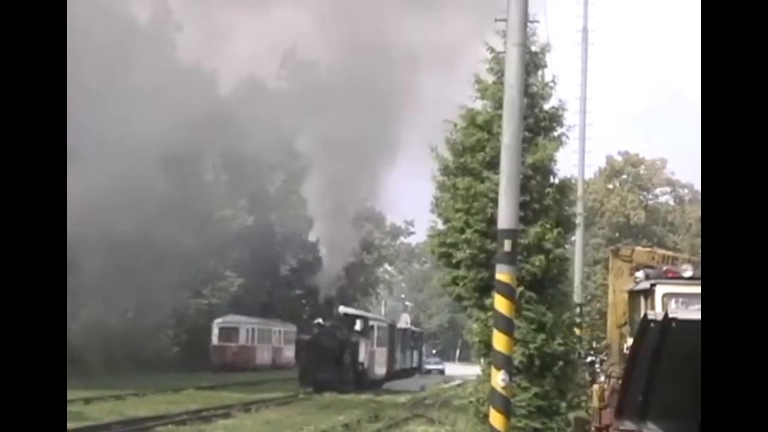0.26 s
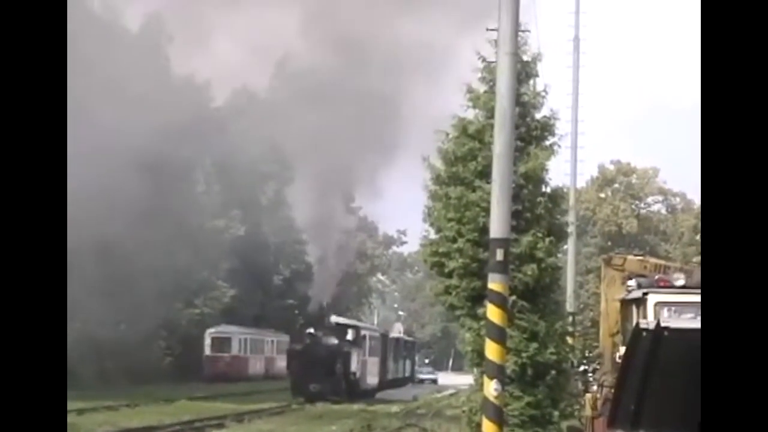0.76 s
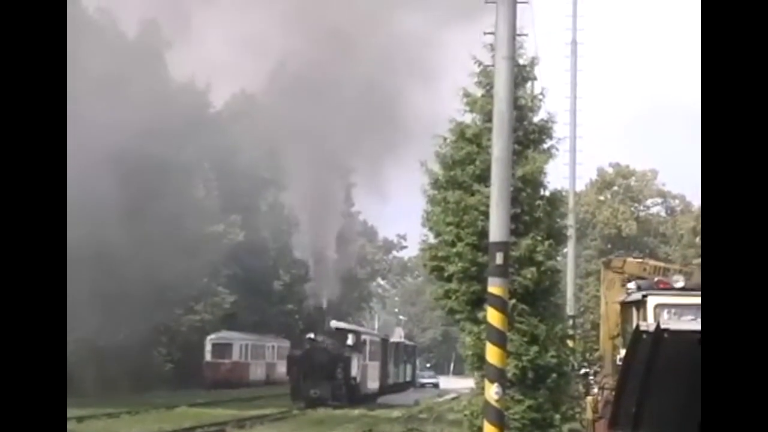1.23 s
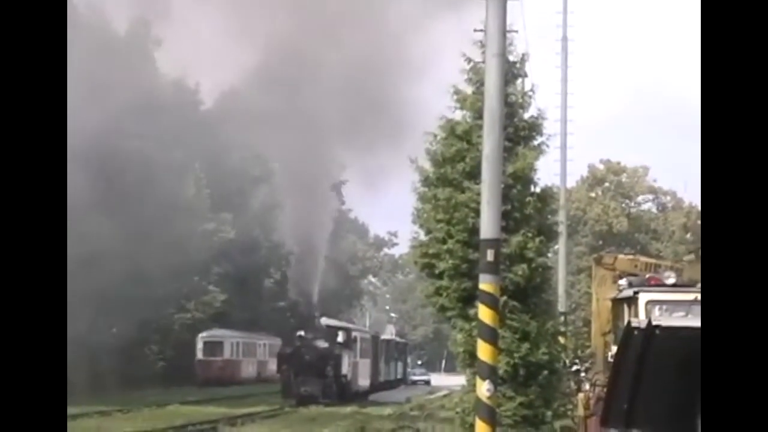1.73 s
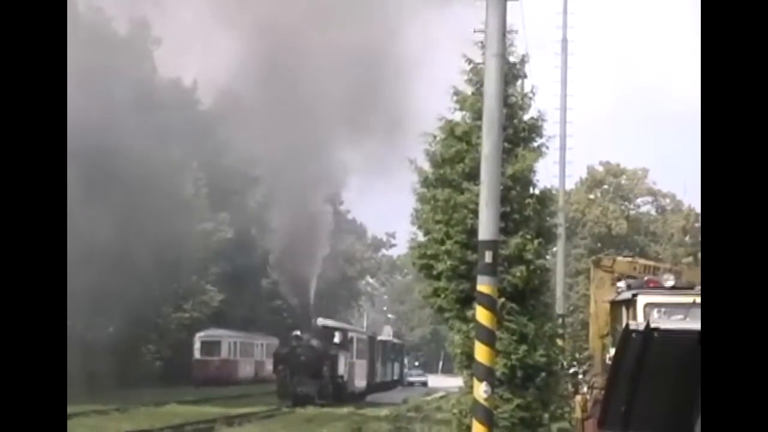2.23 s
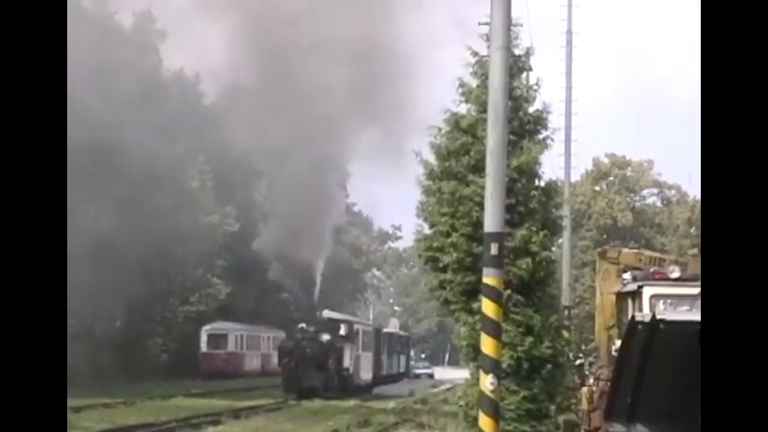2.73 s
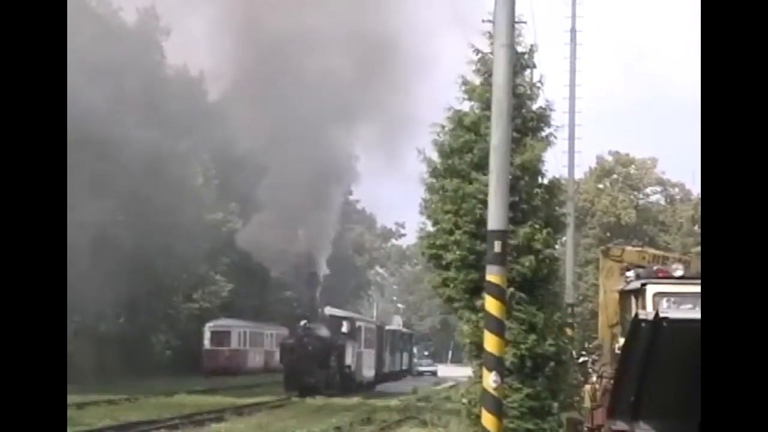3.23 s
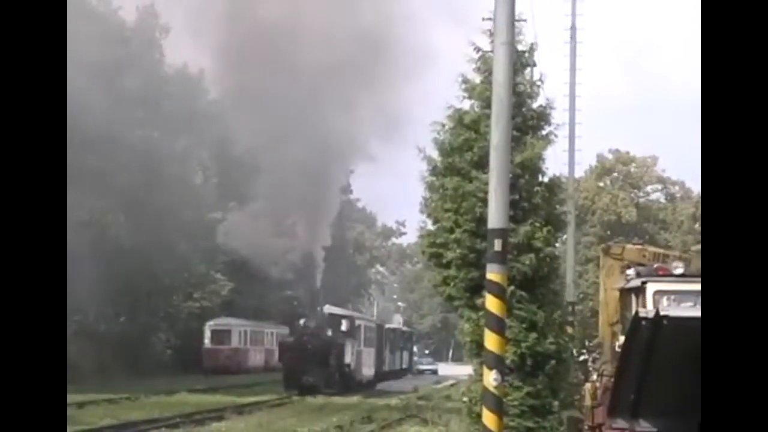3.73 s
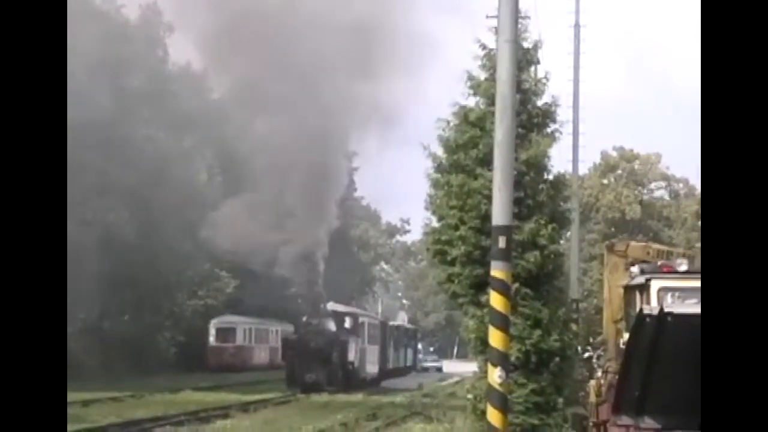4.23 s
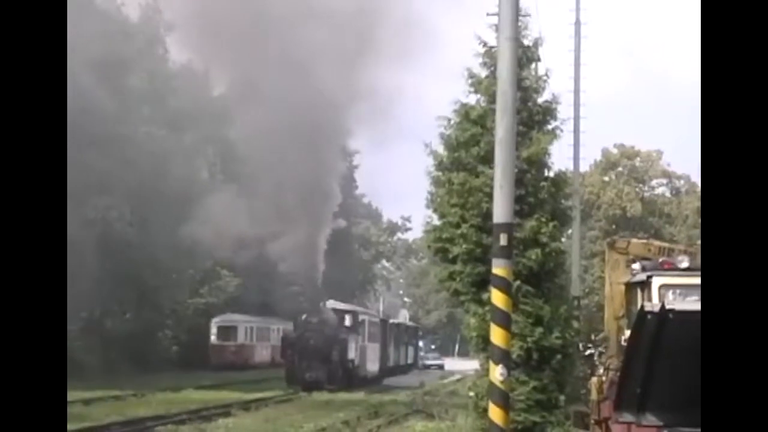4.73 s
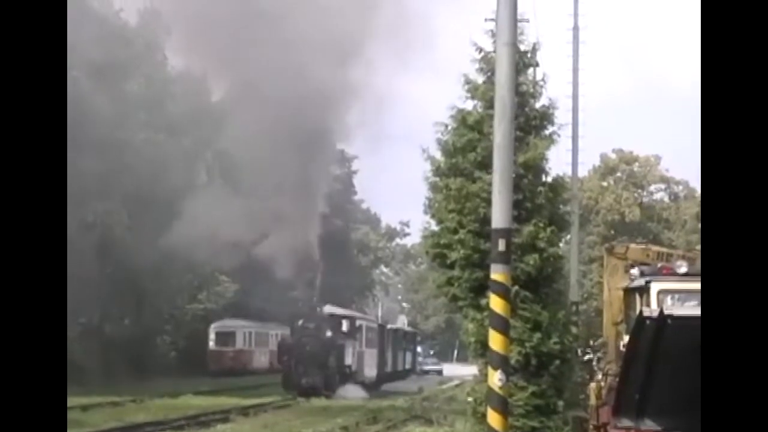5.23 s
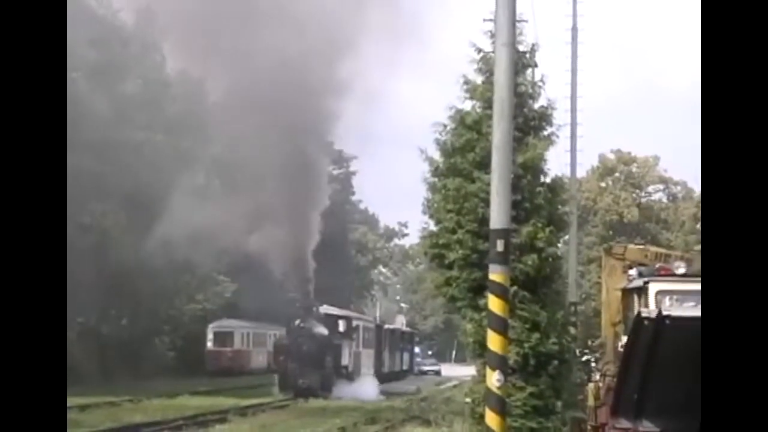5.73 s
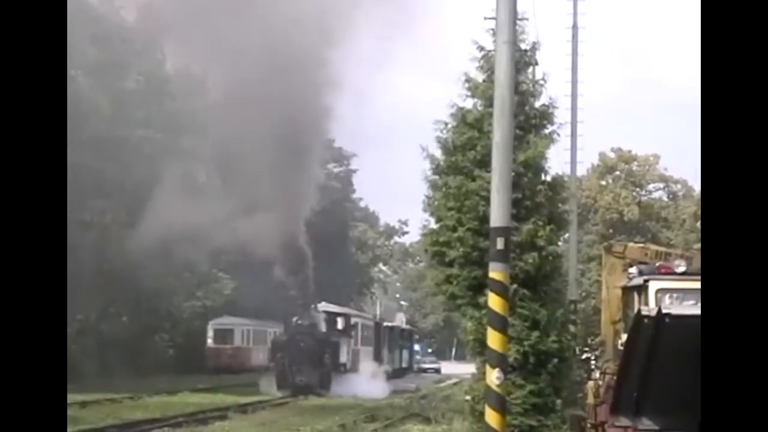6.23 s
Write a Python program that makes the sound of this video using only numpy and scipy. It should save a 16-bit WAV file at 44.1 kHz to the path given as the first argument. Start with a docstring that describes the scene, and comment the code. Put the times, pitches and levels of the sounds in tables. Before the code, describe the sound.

A small steam locomotive some way off chuffs hard and rough, its beat gradually slowing, with hissing spits between strokes and a closing rush of steam.

```python
"""A small steam engine pulls away some distance off among trees, its exhaust beat slowing.
Each beat is a low push of air with a short crack, and a roaring jet up the chimney made of shaped noise.
On every other stroke a drain cock spits, hisses and whistles from just before the beat until about the next;
near the end it opens once more, rising softly. Steady steam and a low, lumpy rumble of noise lie below.
Short echoes blur the engine."""
import sys
import numpy as np
from scipy import signal
from scipy.fft import rfft, irfft, next_fast_len
from scipy.io import wavfile
from scipy.ndimage import uniform_filter1d

SR = 44100
rng = np.random.default_rng(int(sys.argv[2]) if len(sys.argv) > 2 else 0)


def transcribe(u):
    """Save the signal u as a 16-bit wav file named by the first command-line argument.

    u: samples, shape (n,) or (channels, n), limited to [-1, 1]; the rate is SR.
    q: integer samples, one column per channel.
    """
    v = np.clip(np.atleast_2d(u).T, -1, 1)
    q = np.round(v * 32767).astype(np.int16)
    wavfile.write(sys.argv[1], SR, q)


N = 285327
SIZE = next_fast_len(N)
HZ = np.maximum(np.arange(SIZE // 2 + 1) * SR / SIZE, 1)

# In colour tables only the shape counts; the loudness is set elsewhere.
# Exhaust beats: (time [s], low push peak [dB], crack peak [dB], jet level [dB], jet start against that [dB],
# attack [s], valve open [s], top hiss [dB], first rush [dB], upper roar [dB], first rush length [s])
BEATS = [(-.33, -60, -60, -19, -5, .02, 0.22, 5, 0, 0, .1),
         (.2190, -27, -16, -22, -2, 0.017, 0.21, -0.5, 2, 0, 0.092),
         (0.7623, -29.5, -30, -19, -7.5, 0.036, 0.15, 0, -1, 1, 0.098),
         (1.2627, -27.5, -15, -20.5, 5, 0.0055, 0.18, -0.5, 1.5, -0.8, 0.12),
         (1.8322, -27, -27, -19, -6, .02, 0.15, 3.5, -0.1, 1.5, 0.057),
         (2.3436, -27, -7.5, -21.5, -2.5, 0.014, .2, 3.5, 2.5, 2, 0.093),
         (2.9252, -30, -28, -18, -5, 0.062, 0.13, 2, 0.86, 0.8, .11),
         (3.4723, -27, -13, -21.5, 1, 0.0057, 0.2, 3, 4.5, 0.5, 0.062),
         (4.0855, -30.5, -30, -19, -6, 0.031, 0.15, 3.5, -1, 0.3, 0.065),
         (4.744, -30, -18, -19, -2, 0.036, 0.15, 1.5, -0.8, -0.5, 0.093),
         (5.5705, -52, -36, -18.5, -10, 0.041, 0.12, 1.5, 0.4, 1, 0.084)]
# Colour of the jet's roar: (frequency [Hz], level [dB per Hz])
JET_COLOUR = [(90, -30), (250, -13.5), (390, -22), (480, -14), (900, -8), (1050, -5.5), (1600, -3),
              (2300, -3.5), (2750, -2), (3400, -3.5), (4750, -7.5), (5150, -11.5), (7000, -12.5),
              (11000, -24), (13000, -30.5), (14300, -14)]
# Chimney pipe resonances, and the dip between the two roars: (centre [Hz], width [Hz], boost [dB])
CHIMNEY = [(994, 40, 4), (1140, 60, 3), (1252, 50, 4), (1365, 40, 3), (1463, 25, 6), (1571, 35, 5),
           (1694, 35, 5), (1800, 40, 2), (1932, 60, 3), (2179, 45, 5), (2288, 25, 5), (2582, 40, 3),
           (2783, 50, 3), (2800, 600, -3), (3219, 40, 3), (3500, 50, 3), (3715, 35, 4), (3839, 50, 4),
           (4038, 50, 4), (4528, 40, 2), (4650, 300, 3)]
# Drain cock openings: (opens [s], shuts [s], first spit [dB], rise of the flow [s],
# flow level before fading [dB], fade [dB per s])
COCK = [(-.35, .22, -60, .2, -43, 13), (0.74, 1.26, -33.5, .2, -40.5, 8.5),
        (1.809, 2.343, -32.5, 0.15, -36.5, 12), (2.901, 3.464, -39, 0.11, -37, 10),
        (4.062, 4.743, -36.5, 0.5, -44, 5), (5.538, 5.88, -39, .15, -41, 31.5),
        (5.85, 6.6, -56, 0.3, -32.5, 12.5)]
# Colour of the drain cock's hiss: (frequency [Hz], level [dB per Hz])
COCK_COLOUR = [(350, -26), (700, -14.5), (1360, -8.5), (2000, -12.5), (2900, -11), (4300, -12.5),
               (6300, -12.5), (7500, -15), (8600, -17), (9600, -24), (11800, -33.5), (13000, -33),
               (14300, -46)]
# Whistles in the cock's nozzle: (centre [Hz], width [Hz], boost [dB])
COCK_WHISTLES = [(4980, 260, 9), (5330, 240, 10), (5620, 160, 7), (7550, 700, 5), (10650, 800, 8)]
# The spit is brighter than the flow: (frequency [Hz], change [dB])
SPIT_TILT = [(1000, 0), (3500, -5), (5200, 0.5), (8000, 2), (13000, 4)]
# Colour of the steady steam up the chimney: (frequency [Hz], level [dB per Hz])
BLOWER_COLOUR = [(210, -22), (350, -9), (442, -11.5), (492, -7.5), (575, -11.5), (621, -5.5), (651, -9),
                 (3990, -13), (13200, -38), (14200, -57)]
# Rumble levels over time: (time [s], fire and wheels [dB], deep gusts [dB])
RUMBLE = [(0, -66, -64), (.7, -52, -61), (1.1, -60, -64), (1.58, -50, -54), (2.1, -63, -65),
          (3, -59.5, -60.5), (3.9, -56.5, -58), (4.3, -52, -62), (5, -58.5, -57.5), (5.45, -51.5, -55),
          (5.6, -43, -50), (5.74, -56, -59), (5.87, -39, -44.5), (6.05, -51, -61), (6.24, -41, -50),
          (6.47, -47, -57)]
# Colour of fire and wheels: (frequency [Hz], level [dB per Hz])
RUMBLE_COLOUR = [(110, -17.5), (140, -2), (190, -7), (250, -0.5), (330, -11.5), (500, -8.5), (800, -35)]
# Colour of the deep gusts: (frequency [Hz], level [dB per Hz])
GUST_COLOUR = [(15, -40), (25, -35), (40, -8), (65, 4.5), (90, 1.5), (125, 6), (160, -34), (250, -60)]
# How alike left and right are: (frequency [Hz], likeness [1 = the same])
LIKENESS = [(30, 1), (70, 0.99), (200, 1), (280, 1), (430, 0.61), (710, 0.91), (1160, 0.7), (2100, 0.97),
            (2900, 0.87), (4000, 0.96), (5200, 0.64), (7000, 0.4), (9500, 0.53), (11200, 1)]
# How far left runs ahead of right: (frequency [Hz], phase lead [radians])
LEFT_LEADS = [(300, 0.061), (700, -0.055), (1100, 0.053), (2070, -0.92), (2900, -0.87), (4000, -0.55),
              (5200, -0.05), (7000, -0.34), (10500, 0)]
# How much louder left is than right: (frequency [Hz], difference [dB])
LEFT_LOUDER = [(60, 0.5), (300, 0.1), (700, 0.8), (1500, 2), (2200, 0.5), (4000, -1), (7000, 2), (10500, 0)]
# The engine creeps leftwards: (time [s], left louder by [dB])
BEARING = [(0, -0.6), (3, -0.5), (4.5, -0.5), (6.47, 0)]

SAG_DB_PER_S, RELEASE_DB_PER_S = 18.5, 66   # the jet sags while the valve is open, then dies
TAIL_DB, TAIL_DB_PER_S = -13, 24   # steam left in the passages: its level, and its fall after the valve shuts
# As the jet weakens, per dB: upper roar and top hiss lose level, bass gains it in each octave down [dB]
UPPER_FOLLOWS, TOP_FOLLOWS, BASS_FOLLOWS = 0.24, 0.51, 0.063
FRONT_DULL_DB, FRONT_S = -8.5, 0.0069   # the first instant of a jet lacks treble
RUSH_ENDS_S = 0.0096   # softness of the first rush's end
RUSH_BRIGHTENS, UPPER_RUSH = 0.56, 0.26   # top hiss and upper roar added per dB of first rush [dB]
HOLLOW_DB, HOLLOW_FILLS = -3.5, 0.16   # gap between the two roars, filling per dB of falling pressure [dB]
SPIT_DB_PER_S, SPIT_FRONT_DB, SPIT_FRONT_S = 84, 1.5, 0.007   # the spit's fade, and the pop it starts with
RISE_FROM_DB, SHUT_DB_PER_S = -12, 200   # where the flow starts to rise from; how fast a shut cock fades
WHISTLE_STARTS_DB, WHISTLE_SWELLS_DB_PER_S = -6, 9.5   # against the plain flow, growing as the steam dries
BLOWER_DB = -46
FIRE_FOLLOWS = 0.088   # each blast draws the fire: dB per dB of jet
CUTOFF_HZ = 14500


def jet(middle_hz=2000):
    """Overlapping bands of roar; high pressure brightens it, eddies make each band flicker."""
    # the valve takes half a millisecond to open
    below_db, peak_db, bright_db, roar_db = uniform_filter1d(np.array(pressure()), size=24)
    bass_db = BASS_FOLLOWS * below_db
    upper_db = UPPER_FOLLOWS * below_db + roar_db
    top_db = TOP_FOLLOWS * below_db + bright_db
    roar = turbulence(at_hz(JET_COLOUR) + bumps(CHIMNEY), rough_db=0.38, rough_hz=201)
    roar = rfft(heard(roar), SIZE)
    octave = np.log2(HZ / middle_hz)
    puffs_db = 0.51 * drift(8.4)
    out = 0
    for centre in np.arange(-4.5, 3.1, .5):   # in octaves from the middle
        band = irfft(roar * np.clip(1 - 2 * abs(octave - centre), 0, 1), SIZE)[:, :N]
        upper_share = np.interp(centre, [0, 1, 2.5], [0, 1, 0])
        top_share = np.interp(centre, [1, 2.5], [0, 1])
        colour_db = bass_db * min(centre, 0) + upper_db * upper_share + top_db * top_share
        if centre == .5:
            colour_db = colour_db + HOLLOW_DB - HOLLOW_FILLS * below_db
        flicker_db = puffs_db + 1.2 * drift(22)
        out = out + band * from_db(peak_db + below_db + colour_db + flicker_db)
    return out


def pressure():
    """Steam pressure in dB: fall of the jet, its level, top hiss and upper roar, following each valve opening."""
    t = np.arange(N) / SR
    beats = np.array(BEATS)
    latest = beats[np.searchsorted(beats[:, 0], t) - 1]
    s, _, _, peak_db, start_db, attack, hold, top_db, burst_db, upper_db, rush = latest.T
    age = t - s
    since_shut = np.maximum(age - hold, 0)
    blast = -SAG_DB_PER_S * np.minimum(age, hold) - RELEASE_DB_PER_S * since_shut
    tail = TAIL_DB - TAIL_DB_PER_S * since_shut
    rush_db = burst_db / (1 + np.exp(np.minimum((age - rush) / RUSH_ENDS_S, 50)))
    front_db = FRONT_DULL_DB * np.exp(-age / FRONT_S)
    both_db = 10 * np.log10(from_db(2 * blast) + from_db(2 * tail))   # the two powers add
    below_db = both_db + start_db * np.clip(1 - age / np.maximum(attack, .001), 0, 1)
    bright_db = top_db + RUSH_BRIGHTENS * rush_db + front_db
    roar_db = upper_db + UPPER_RUSH * rush_db + 0.99 * front_db
    return below_db, peak_db + rush_db, bright_db, roar_db


def pushes():
    """The valve opens: a slug of air gives one low swing, its front a short crack."""
    _, push_db, crack_db = np.transpose(BEATS)[:3]
    low_swing = pulses(push_db, low_hz=83.6, high_hz=284)
    return low_swing + pulses(crack_db, low_hz=1500, high_hz=4200)


def pulses(peaks_db, low_hz, high_hz):
    """A kick through a band filter gives one short swing of the given peak at each beat."""
    kick = np.zeros(2000)
    kick[0] = 1
    band = signal.butter(2, [low_hz, high_hz], "band", fs=SR, output="sos")
    swing = signal.sosfilt(band, kick)
    clicks = np.zeros(N + SR)   # one spare second ahead, for the beat before time zero
    clicks[np.round(np.array(BEATS)[:, 0] * SR).astype(int) + SR] = from_db(peaks_db)
    return signal.fftconvolve(clicks, swing / abs(swing).max())[SR:SR + N]


def drain_cock():
    """A bright spit as the cock opens, then a smooth hiss; the nozzle's whistle gains on it until it shuts."""
    t = np.arange(N) / SR
    spit, flow, whistle = 0, 0, 0
    for opens, shuts, spit_db, rise, flow_db, fade in COCK:
        age = np.maximum(t - opens, 0)
        gate = (t >= opens) * from_db(-SHUT_DB_PER_S * np.maximum(t - shuts, 0))
        pop_db = SPIT_FRONT_DB * np.exp(-age / SPIT_FRONT_S)
        spit = spit + gate * from_db(spit_db - SPIT_DB_PER_S * age + pop_db)
        rise_db = RISE_FROM_DB * np.clip(1 - age / rise, 0, 1)
        stream = gate * from_db(flow_db - fade * age + rise_db)
        flow = flow + stream
        swell_db = WHISTLE_SWELLS_DB_PER_S * np.minimum(age, shuts - opens)
        whistle = whistle + stream * from_db(WHISTLE_STARTS_DB + swell_db)
    hiss = turbulence(0, rough_db=-0.5, rough_hz=120) * from_db(at_hz(COCK_COLOUR))
    spit_noise = heard(hiss * from_db(at_hz(SPIT_TILT)))
    whistle_noise = heard(hiss * (from_db(bumps(COCK_WHISTLES)) - 1))   # only what the resonances add
    return spit * spit_noise + flow * heard(hiss) + whistle * whistle_noise


def blower():
    """A thin steady hiss: turbulent steam flowing up the chimney."""
    return from_db(BLOWER_DB) * heard(turbulence(at_hz(BLOWER_COLOUR), rough_db=-1.4, rough_hz=30))


def scatter(dry, echo_db=-8, t60=0.14):
    """Coaches, ground and trees send back a dense cluster of echoes that drifting air keeps changing."""
    t, step = np.arange(int(.12 * SR)) / SR, int(.15 * SR)
    fade = np.hanning(2 * step + 1)[:-1]   # neighbouring pieces cross-fade
    padded = np.pad(dry, ((0, 0), (step, 2 * step)))
    out = np.zeros((2, N + 4 * step + len(t)))
    for a in range(0, N + step, step):
        echoes = rng.standard_normal(len(t)) * from_db(-60 * t / t60) * (t > .002)
        echoes *= from_db(echo_db) / np.sqrt(np.sum(echoes ** 2))
        piece = padded[:, a:a + 2 * step] * fade
        out[:, a:a + 2 * step + len(t) - 1] += signal.fftconvolve(piece, echoes[None], axes=1)
    return dry + out[:, step:step + N]


def rumble():
    """Low lumpy noise in two registers: fire and wheels, stirred by the blasts, and deeper gusts."""
    fire_db, gust_db = in_time(RUMBLE)
    draught_db = uniform_filter1d(pressure()[0], size=3000)
    draw_db = FIRE_FOLLOWS * (draught_db - draught_db.mean())
    fire = heard(turbulence(at_hz(RUMBLE_COLOUR), rough_db=3.0, rough_hz=24))
    gusts = heard(turbulence(at_hz(GUST_COLOUR), rough_db=3.5, rough_hz=4.9))
    return from_db(fire_db + draw_db) * fire + from_db(gust_db) * gusts


def turbulence(colour_db, rough_db, rough_hz):
    """Spectrum of lumpy noise from churning flow, partly alike on left and right."""
    lumps = from_db(rough_db * drift(rough_hz))
    direct, stray = rfft(rng.standard_normal((2, N)) * lumps, SIZE)
    alike = np.clip(at_hz(LIKENESS), 0, 1)
    # half the left-right difference goes to each side
    lean = from_db(at_hz(LEFT_LOUDER) / 2) * np.exp(.5j * at_hz(LEFT_LEADS))
    mid, side = np.sqrt(1 + alike) * direct, np.sqrt(1 - alike) * stray
    return from_db(colour_db) * np.array([(mid + side) * lean, (mid - side) / lean])


def drift(rate):
    """Slow random wander with an rms of 1, from noise smoothed twice; rate in Hz."""
    r = np.exp(-16 * np.pi * rate / SR)   # worked out at an eighth of the sample rate
    noise = rng.standard_normal(N // 8 + 6002)
    slow = signal.lfilter([1], [1, -2 * r, r * r], noise)[6000:]
    return np.interp(np.arange(N) / 8, np.arange(len(slow)), rms_one(slow))


def heard(spectrum):
    """Turn a spectrum back into sound, scaled to rms 1."""
    return rms_one(irfft(spectrum, SIZE)[:, :N])


def bumps(peaks):
    """Resonances as dB added round each centre."""
    return sum(db / (1 + (2 * (HZ - hz) / width) ** 2) for hz, width, db in peaks)


def at_hz(points):
    """A spectrum table read at every frequency, on a log scale."""
    hz, value = np.array(points).T
    return np.interp(np.log(HZ), np.log(hz), value)


def in_time(rows):
    """Columns of a table over time, one value a sample."""
    s, *columns = np.transpose(rows)
    return [np.interp(np.arange(N) / SR, s, c) for c in columns]


def rms_one(x):
    """Scale a signal to rms 1."""
    return x / np.sqrt(np.mean(x ** 2) + 1e-20)


def from_db(db):
    """Decibels to gain."""
    return 10 ** (np.asarray(db) / 20)


def scene():
    """The engine with its echoes, creeping leftwards, over the rumble."""
    engine = scatter(jet() + pushes() + drain_cock() + blower())
    left_right_db = in_time(BEARING)[0] * [[.5], [-.5]]
    return engine * from_db(left_right_db) + rumble()


def record(dry):
    """A steep filter cuts the highest treble."""
    return signal.sosfilt(signal.cheby2(12, 70, CUTOFF_HZ, fs=SR, output="sos"), dry)


dry = scene()
out = record(dry)
transcribe(out)
```